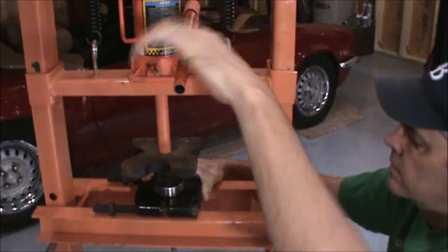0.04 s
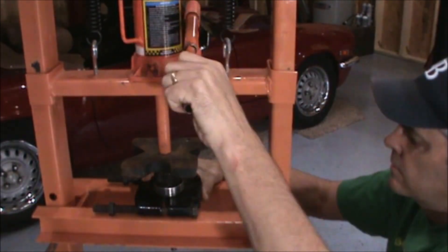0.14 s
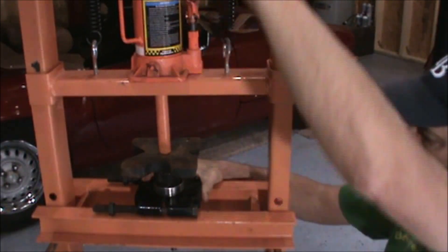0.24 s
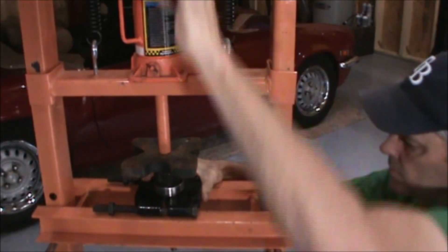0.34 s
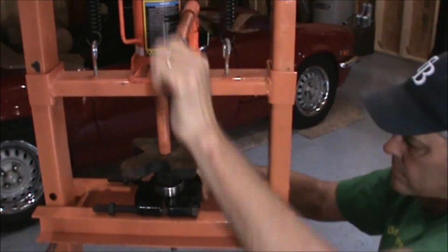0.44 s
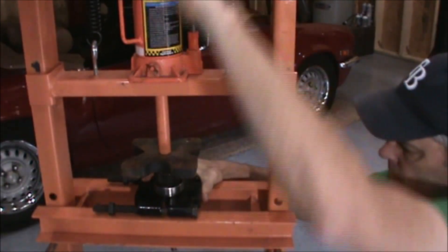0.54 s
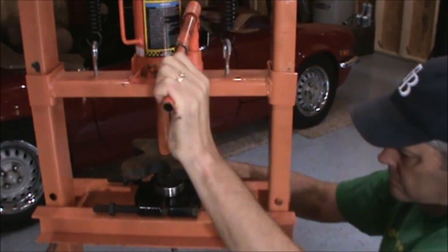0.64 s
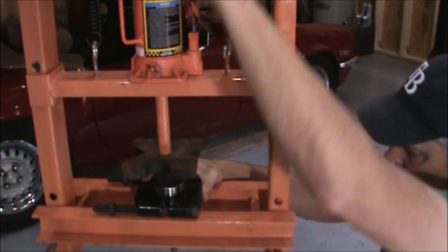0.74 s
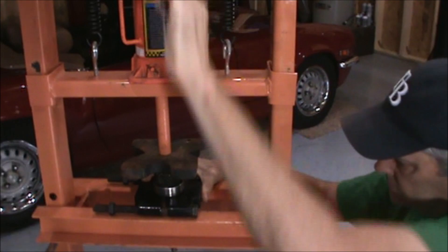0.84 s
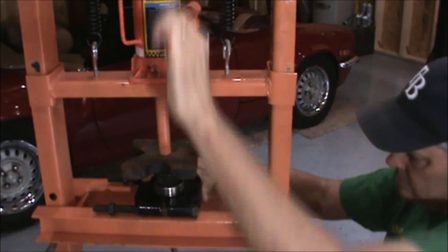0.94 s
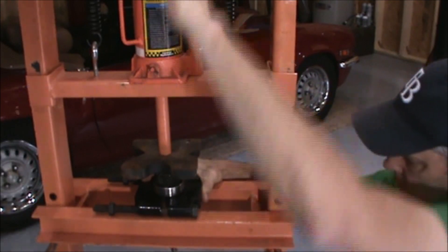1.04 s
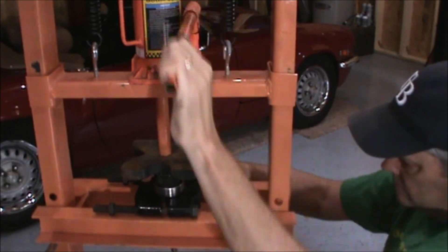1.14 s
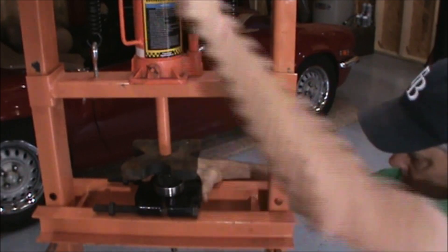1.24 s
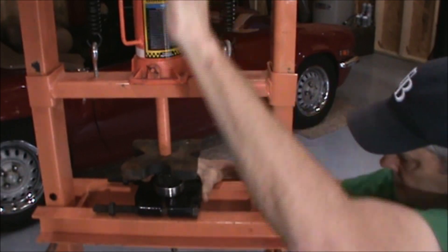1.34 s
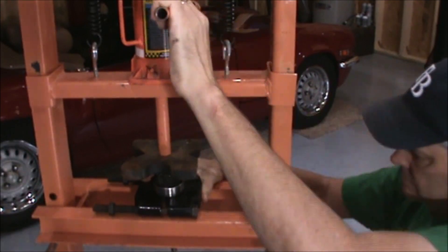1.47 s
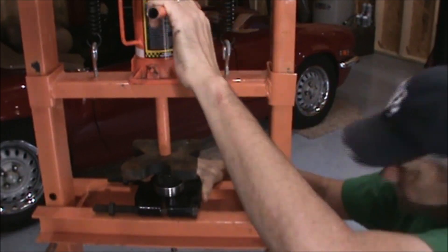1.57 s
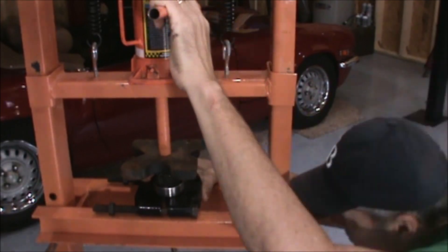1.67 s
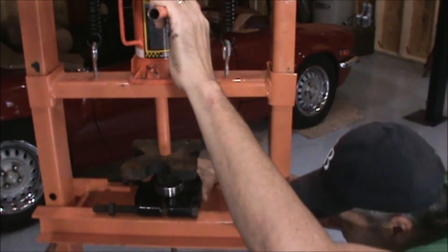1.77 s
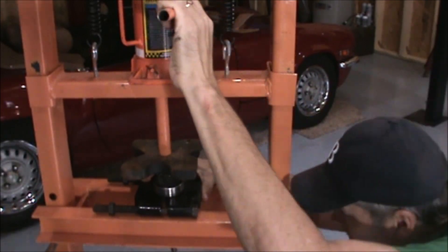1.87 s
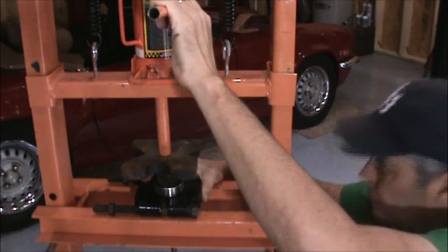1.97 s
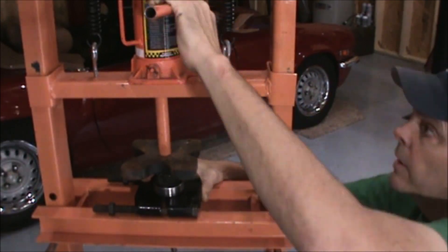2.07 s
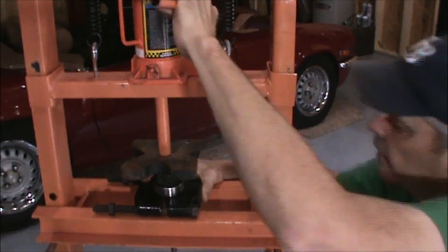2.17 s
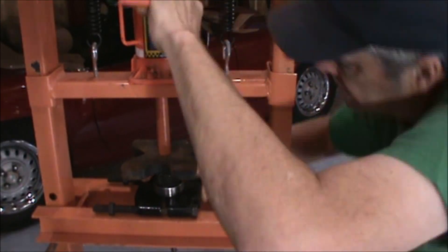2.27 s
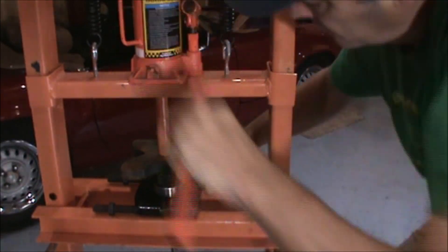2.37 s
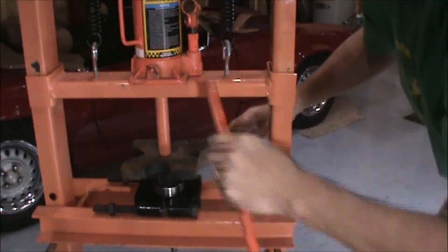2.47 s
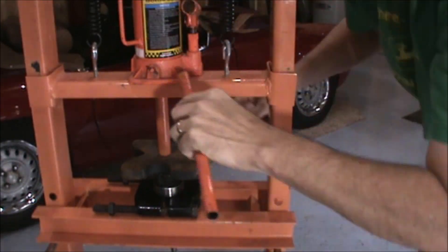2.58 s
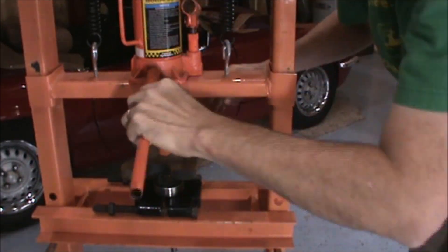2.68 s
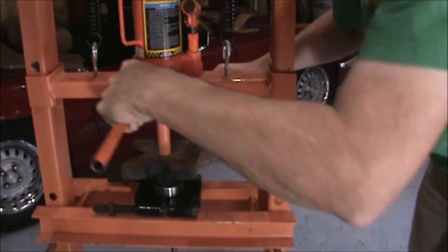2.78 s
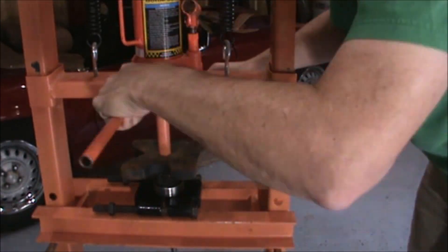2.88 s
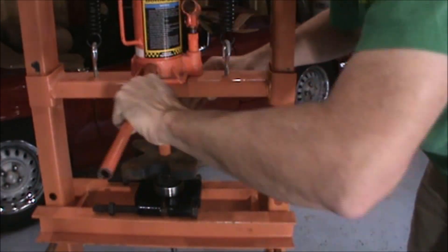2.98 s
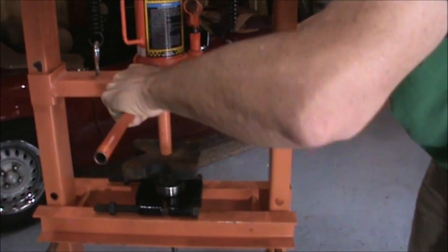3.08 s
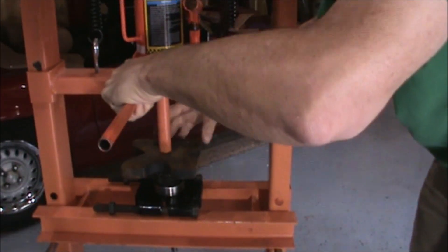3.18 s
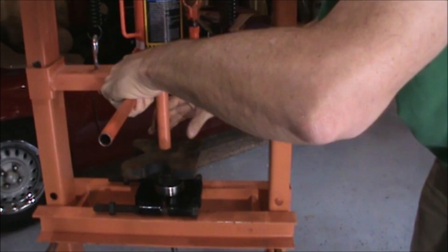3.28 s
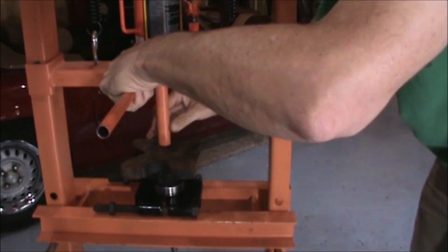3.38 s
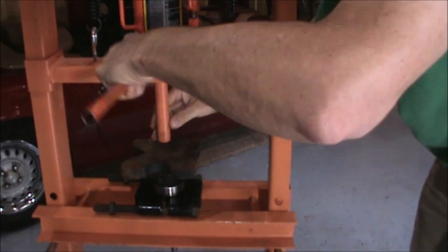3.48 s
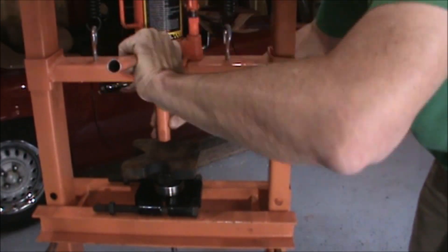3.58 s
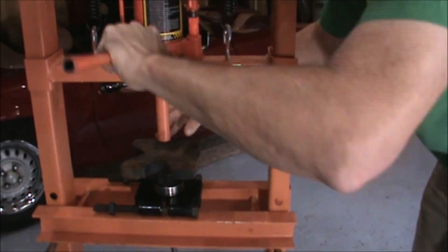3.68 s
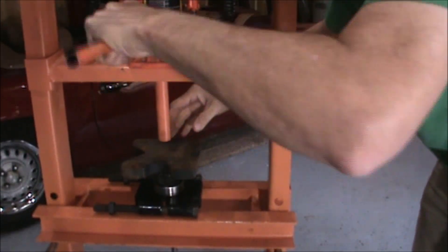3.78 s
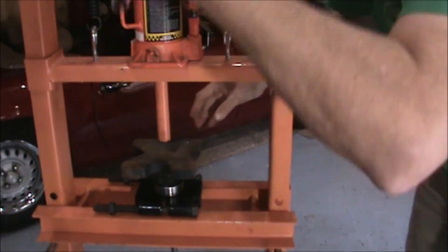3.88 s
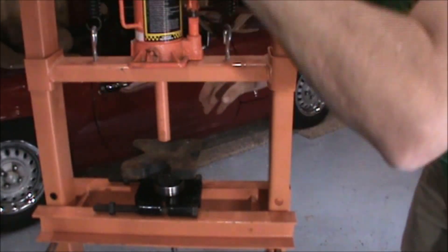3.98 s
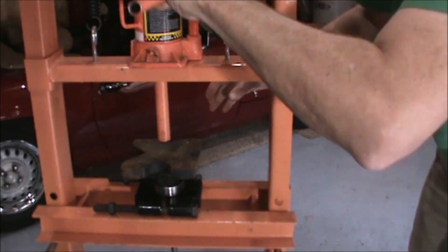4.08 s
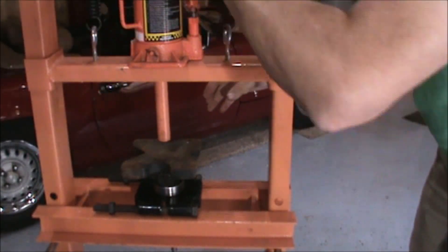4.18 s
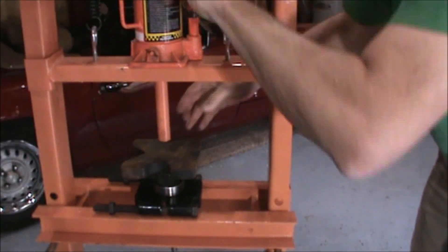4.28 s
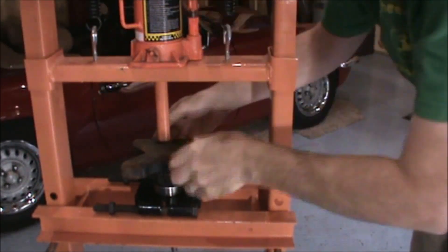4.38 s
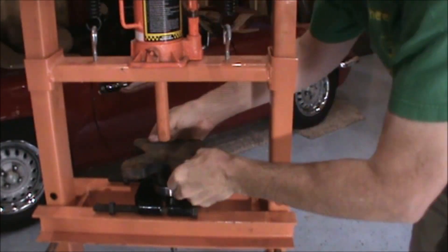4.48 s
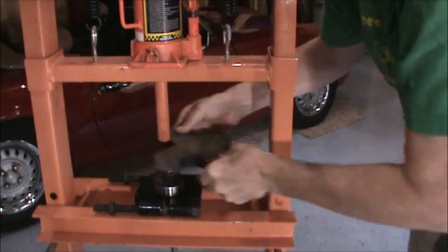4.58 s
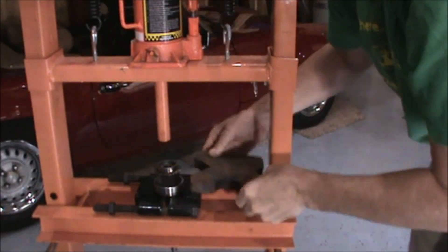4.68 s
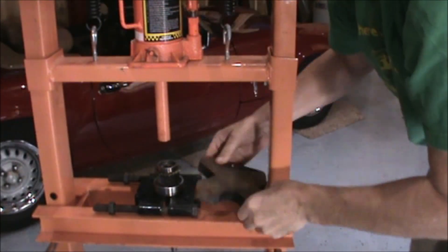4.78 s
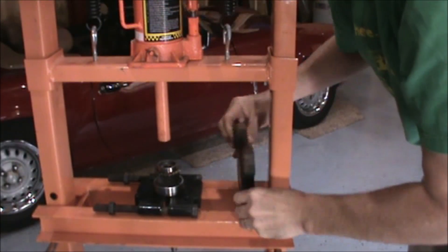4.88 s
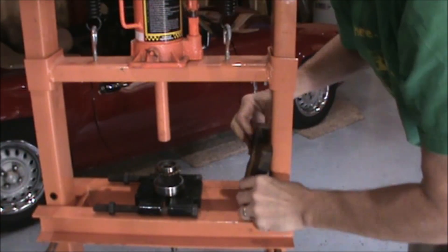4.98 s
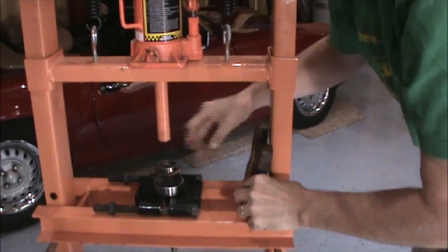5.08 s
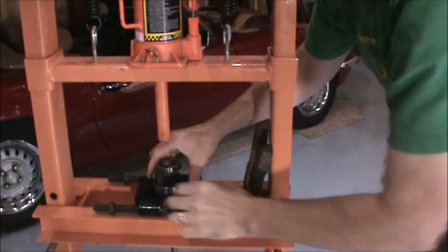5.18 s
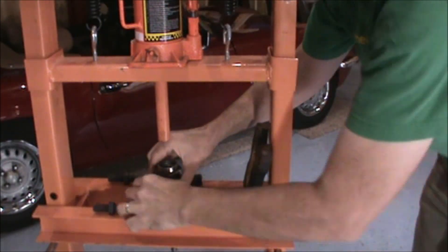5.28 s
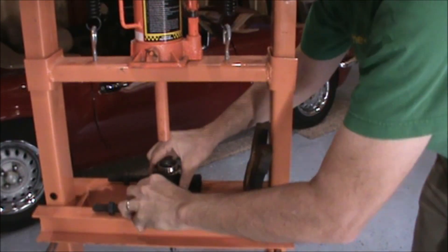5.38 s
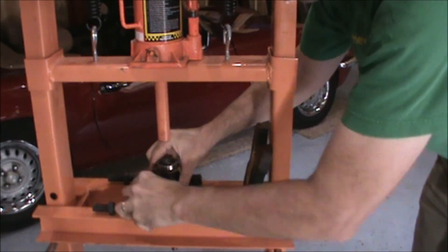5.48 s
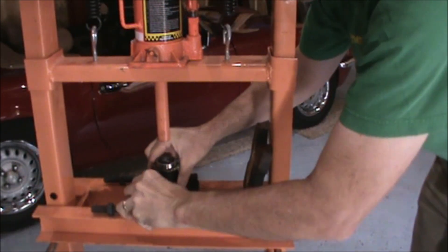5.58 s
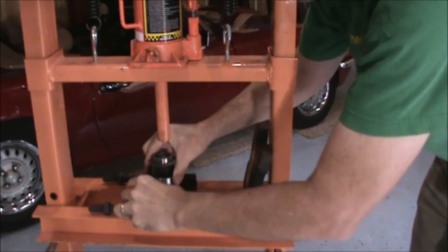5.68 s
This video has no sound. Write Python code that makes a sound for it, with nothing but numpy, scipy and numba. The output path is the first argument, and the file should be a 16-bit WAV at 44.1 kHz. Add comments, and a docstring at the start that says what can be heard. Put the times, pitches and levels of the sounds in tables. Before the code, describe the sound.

A steel tube clanks five times in quick succession against the valve of a jack, leaving a thin, high ring. After a short creak come irregular metallic knocks and rattles, a faint sliding hiss and a brief squeal from the pump. More clinks follow, then one bright clang of a steel plate and a light tink. The sounds are fairly dry and slightly left, over the steady rush and hum of a garage fan.

```python
"""In a garage, a bottle jack on a steel shop press is worked by hand while a fan hums behind.
The hollow handle clanks on the release valve in five quick twists, creaks off it, knocks into the pump
socket, squeals through a stroke and rattles out again; then a steel plate is set down. Struck steel
rings at many pitches at once; rubbed steel sticks and slips, so it creaks, squeals or hisses.
The camera's gain control holds down the loud blows."""
import sys
import numpy as np
from scipy import signal
from scipy.fft import rfft, irfft
from scipy.io import wavfile
from numba import njit

SR = 44100
rng = np.random.default_rng(int(sys.argv[2]) if len(sys.argv) > 2 else 0)


def file_out(sig):
    """Save sig as 16-bit WAV at sys.argv[1]."""
    # one column per channel
    cols = np.atleast_2d(sig).T
    # limit, then scale
    lim = np.clip(cols, -1, 1)
    pcm = np.round(lim * 32767).astype(np.int16)
    wavfile.write(sys.argv[1], SR, pcm)


N = 252674
T = np.arange(N) / SR


def undb(db):
    """Turn decibels into a gain to multiply by."""
    return 10 ** (np.asarray(db) / 20)


def unit(x):
    """Scale a sound to an average (rms) strength of 1."""
    return x / np.sqrt(np.mean(x ** 2))


def tint(x, points):
    """Shape bass and treble along a curve of (pitch_hz, level_db) points."""
    hz, db = np.transpose(points)
    bins_hz = np.maximum(np.fft.rfftfreq(x.shape[-1], 1 / SR), 1)
    return irfft(rfft(x) * undb(np.interp(np.log(bins_hz), np.log(hz), db)), x.shape[-1])


def cut_bass(x, hz):
    """Weaken everything below hz."""
    return signal.sosfilt(signal.butter(2, hz, "high", fs=SR, output="sos"), x)


def resonate(x, body):
    """Let a sound ring a body made of (pitch_hz, width_hz, level_db) resonances."""
    return sum(undb(db) * signal.lfilter(*signal.iirpeak(hz, hz / width, fs=SR), x)
               for hz, width, db in body)


def wander(per_s):
    """A random drift of about 1 either way, turning per_s times a second."""
    points = rng.standard_normal(int(N / SR * per_s) + 2)
    return np.interp(T * per_s, np.arange(len(points)), points)


def swell(times, db):
    """A gain that follows a level curve and is silent outside it."""
    return undb(np.interp(T, times, db)) * (T >= times[0]) * (T <= times[-1])


def gesture(start_s, rise_s, hold_s, fade_s):
    """A gain that rises, holds and dies away. Here and below, fade_s is the time to fall 60 dB."""
    rising = np.clip((T - start_s) / rise_s, 0, 1) ** 2
    return rising * undb(-60 * np.maximum(T - start_s - rise_s - hold_s, 0) / fade_s)


def add(out, start_s, sound):
    """Mix a sound in at start_s."""
    start = int(start_s * SR)
    out[:, start:start + sound.shape[-1]] += sound[..., :N - start]


# the bass and treble of the rushing air: pitch_hz, level_db
AIR_COLOUR = [(24, -73), (40, -51.5), (144, -19), (329, -8.5), (382, -9.5), (479, -5.5), (585, -10.5),
              (942, -8), (2100, -13), (4240, -14), (4570, -13.5), (6020, -17.5), (6650, -19), (11300, -23),
              (16000, -29)]
# the air noise, which swells and sinks over time: time_s, level_db
AIR_LEVELS = [(0, -49.5), (1.9, -52), (2.6, -48), (3.3, -46.5), (3.9, -51), (4.4, -51.5), (4.7, -49),
              (5.3, -53.5), (5.73, -49.5)]
# the tones of the fan: pitch_hz, level_db
FAN_TONES = [(336, -103), (480, -60), (962, -65), (1346, -63.5)]

def fan():
    """A fan makes rushing air and wavering tones; the bass is alike in both ears."""
    mid, side = unit(tint(rng.standard_normal((2, N)), AIR_COLOUR))
    side = undb(-12) * tint(side, [(300, -19), (1200, 1.5), (12000, 11.0)])
    air = np.array([mid + side, mid - side]) * undb(np.interp(T, *np.transpose(AIR_LEVELS)))
    hum = 0
    for hz, db in FAN_TONES:
        gain = undb(db + 2 * wander(4.7))
        pitch_hz = hz * (1 + 0.00343 * wander(15))
        hum += gain * np.sin(2 * np.pi * np.cumsum(pitch_hz) / SR)
    return air + np.sqrt(2) * hum


def room(x, echo_db=-13, fade_s=0.16, treble_fade_s=0.03, side_db=-6):
    """The cluttered garage adds a short wash of echoes whose treble dies first."""
    t = T[:SR // 2]
    mid, side = rng.standard_normal((2, len(t)))
    noise = np.array([mid + undb(side_db) * side, mid - undb(side_db) * side])
    low = tint(noise, [(4500, 8.5), (9000, 0)])
    tail = (low * undb(-60 * t / fade_s) + (noise - low) * undb(-60 * t / treble_fade_s)) * (t > .004)
    tail = tail / np.sqrt(np.sum(tail ** 2) / 2)
    return x + undb(echo_db) * signal.fftconvolve(x.mean(axis=0)[None], tail, axes=1)[:, :N]


def slide(body, grain_db):
    """Sliding steel catches on countless tiny bumps, which ring its body."""
    catches = rng.standard_normal(N) * undb(grain_db * wander(620))
    return unit(resonate(catches, body))


# how loudly the plunger slides: time_s, level_db
PLUNGER_LEVELS = [(3.08, -45), (3.16, -50.5), (3.36, -46.5), (3.56, -42), (3.7, -57)]
# the resonances of the plunger: pitch_hz, width_hz, level_db
PLUNGER_BODY = [(4220, 32, 1.5), (7000, 240, -10.5), (10700, 1700, -10), (12000, 150, -9), (12800, 320, -8),
                (14000, 150, -6), (15700, 500, -11)]

def plunger():
    """The pump plunger slides with a thin hiss."""
    return slide(PLUNGER_BODY, grain_db=3.5) * swell(*np.transpose(PLUNGER_LEVELS))


# the scrapes of the handle: start_s, rise_s, hold_s, fade_s, level_db
SCRAPES = [(2.167, 0.051, 0.048, 0.37, -36), (3.573, 0.0045, .003, 0.11, -31)]
# the resonances that scraping wakes: pitch_hz, width_hz, level_db
SCRAPE_BODY = [(2720, 280, 1), (3130, 870, 7), (6900, 2200, 0.5), (10500, 370, 7)]

def scrapes():
    """The handle slides over dry steel."""
    gain = sum(undb(db) * gesture(*timing) for *timing, db in SCRAPES)
    return slide(SCRAPE_BODY, grain_db=1.5) * gain


# the course of the creak: time_s, slips_per_s, relative_level_db
CREAK_SLIPS = [(2.136, 800, -34.5), (2.146, 700, -24), (2.174, 990, -25), (2.188, 530, -28.5),
               (2.204, 630, -47)]
# the resonances that creaking wakes: pitch_hz, width_hz, level_db
CREAK_BODY = [(800, 1030, 3.5), (2250, 330, 6), (2555, 40, 12), (5940, 1340, 4.5)]

def creak():
    """Twisted off the valve, the handle slips in uneven jerks, and each one rings it."""
    times, slips_per_s, db = np.transpose(CREAK_SLIPS)
    slip_count = np.cumsum(np.interp(T, times, slips_per_s) * (1 + .07 * wander(600))) / SR
    slips = np.diff(np.floor(slip_count), prepend=0) * undb(4.3 * wander(500))
    colour = [(300, -14), (700, -0.5), (2800, 3.5), (4000, -3.0), (6300, -12.0), (12000, -5.5)]
    return unit(tint(resonate(slips, CREAK_BODY), colour)) * swell(times, db - 3.5)


# steel squealing on steel: start_s, hold_s, pitch_hz, glide_hz_per_s, level_db, roughness (0 to 1)
SQUEALS = [(3.087, .004, 13550, 50000, -23, 0.1), (3.487, 0.015, 2395, 400, -22.5, 0.02),
           (3.503, 0.049, 3610, 1232, -23, 0), (3.564, .004, 3800, -5000, -27, 0.06)]
# a squeal's tones at 1, 2, 3 and 4 times its pitch: level_db
SQUEAL_HARMONICS = [2, -3.5, -7.5, -10.5]

def squeals(rise_s=0.0064, fade_cycles=230, hand_waver=0.0044):
    """The pump linkage sticks and slips in step with one of its own tones, so it sings."""
    out = np.zeros(N)
    for start_s, hold_s, hz, glide, db, roughness in SQUEALS:
        pitch_hz = hz + glide * np.clip(T - start_s, 0, 2 * (rise_s + hold_s))
        pitch_hz *= 1 + roughness * wander(1500) + hand_waver * wander(90)
        phase = 2 * np.pi * np.cumsum(pitch_hz) / SR
        phase += .12 * wander(3000)  # each slip comes a little early or late
        tone = sum(undb(level) * np.sin(k * phase)
                   for k, level in enumerate(SQUEAL_HARMONICS, 1) if k * hz < SR / 2)
        gain = undb(db + 2 * wander(700)) * gesture(start_s, rise_s, hold_s, fade_cycles / hz)
        out += gain * unit(tone)
    return out


def ring(tones, split=0.00281, neighbour_db=-9, spread=.05):
    """Steel sings on; an uneven wall splits each tone into a throbbing pair with weaker neighbours."""
    t, out = T[:2 * SR], 0
    for hz, db, fade_s in tones:
        offset, above, below, first, second = rng.uniform(-1, 1, 5)
        phase = 2 * np.pi * hz * t
        pair = np.sin(phase + np.pi * first) + 0.6 * np.sin(phase * (1 + split * offset) + np.pi * second)
        neighbours = np.sin(phase * (1 + spread * abs(above))) - np.sin(phase * (1 - spread * abs(below)))
        neighbours *= undb(neighbour_db) * (hz / 5000) ** 2  # stronger in the treble, where tones crowd
        out += undb(db) * (pair + neighbours) * undb(-60 * t / fade_s)
    return out


# the moments when the hollow handle rings on, after a clank or the squeal: start_s, level_db
HANDLE_RINGS = [(.44, -48), (1.4113, -30), (3.57, -52)]
# the lingering tones of the handle: pitch_hz, level_db, fade_s
HANDLE_LONG_TONES = [(2360, 8.5, 0.22), (2598, -11.5, 1.95), (2660, -4.5, 0.56), (2740, 7, 0.15),
                     (3370, 5, 0.17), (3650, -26, 1.3), (5440, 8, 0.35), (4400, -21, 2.3), (4200, -24, 1.0),
                     (4720, -6.5, 0.98), (5050, -14, 1.6), (4780, 7.5, 0.34), (5200, 3, 0.34),
                     (5250, -7, 0.57), (5370, 6.5, 0.55), (5200, -9, 0.84), (5502, -11.5, 2.1),
                     (5670, -9, 1.35), (5766, -10.5, 1.2), (6140, -3, 0.83), (5920, -3, 1.23),
                     (5880, 11.5, 0.43), (6000, -8.5, 1.96), (6600, -14, 0.75), (6440, -6, 0.54),
                     (6680, 9, 0.23)]

def handle_shimmer():
    """The hollow handle rings on after a clank or the squeal; it is too thin to give off bass."""
    out = np.zeros((2, N))
    for start_s, db in HANDLE_RINGS:
        add(out, start_s, undb(db) * ring(HANDLE_LONG_TONES))
    return cut_bass(out, 1200)


def strike(hits, tones, colour, long_tones, ring_db, side_db, low_hz, noise_db=-1.5, detune=.004):
    """Struck steel gives a few strong tones, countless weak ones (played as noise) and a long ring."""
    out, t = np.zeros((2, N)), T[:SR // 3]
    tone_hz, tone_db = np.transpose(tones)
    for start_s, db, treble_db, fade_s, rise_s in hits:
        # each blow meets another spot and grip, which changes the strength and pitch of every tone
        flip, louder, sharper = rng.standard_normal((len(tones), 3)).T
        weights = np.sign(flip) * undb(tone_db + 2.5 * louder + treble_db * np.log2(tone_hz / 5000) / 3)
        waves = np.sin(2 * np.pi * np.outer(tone_hz * (1 + detune * sharper), t))
        clang = weights / np.linalg.norm(weights) @ waves
        # loose faces chatter while they touch, so the start is gritty
        chatter = undb(3 * np.repeat(rng.standard_normal(len(t)), 24)[:len(t)] * np.exp(-t / .03))
        noise = unit(tint(rng.standard_normal((2, len(t))) * chatter, colour))
        # a harder contact is brighter
        noise = tint(noise, [(1500, -treble_db / 4), (5000, 0), (14000, treble_db)])
        mid = undb(noise_db) * noise[0] + clang
        side = undb(side_db) * tint(noise[1], [(7000, -0.5), (13000, 1.5)])
        envelope = np.minimum(1, t / rise_s) ** 2 * undb(-60 * np.maximum(t - rise_s, 0) / fade_s)
        add(out, start_s, undb(db) * unit(np.array([mid + side, mid - side])) * envelope)
        if db > -19:  # only firm blows wake the long ring
            add(out, start_s, undb(db + ring_db) * ring(long_tones))
    return cut_bass(out, low_hz)  # narrow steel parts give off hardly any bass


# small parts touching: start_s, level_db, treble_db, fade_s, rise_s
TINKS = [(3.155, -20, -4.5, 0.043, 0.0035), (4.553, -29.5, -15, 0.034, 0.00044),
         (5.402, -32, -11, 0.21, 0.0022), (5.405, -17.5, -0.5, 0.023, 0.0063)]
# their short tones: pitch_hz, level_db
TINK_TONES = [(4585, -14), (4830, -15), (6765, -21), (8625, 0)]
# their lingering tone: pitch_hz, level_db, fade_s
TINK_RING = [(8625, 0, 0.13)]

def tinks():
    """Small steel parts tink together; their weak tones are coloured like the handle's."""
    return strike(TINKS, TINK_TONES, HANDLE_COLOUR, TINK_RING,
                  ring_db=-46, side_db=-22, low_hz=700, noise_db=-6.5)


# the bumps of the plate: start_s, level_db, treble_db, fade_s, rise_s
PLATE_HITS = [(4.785, -27.5, -5.5, 0.11, 0.0021), (4.9801, -40.5, -16, 0.22, 0.00098),
              (5.0339, -10, 9.5, .12, 0.0005), (5.5213, -44, 7, 0.084, 0.0032)]
# its strong, short tones: pitch_hz, level_db
PLATE_TONES = [(2090, 6), (2750, 7), (3230, 14), (3357, -1), (3484, 9), (4430, 1), (4633, 5.5), (4826, 8.5),
               (5130, 7), (5534, 7), (8430, -3), (10250, -3)]
# its countless weak tones, as a curve: pitch_hz, level_db
PLATE_COLOUR = [(50, -33), (300, -26), (700, -9), (1200, 0), (2300, 1.5), (3300, 7), (5300, 0), (7200, -3),
                (8400, -2.5), (11000, -11.5), (16000, -17.5)]
# its lingering tones: pitch_hz, level_db, fade_s
PLATE_RING = [(4823, 0, .38), (5055, -14, .3), (5862, -9, .45)]

def plate():
    """A steel plate is lifted and set down with a clang."""
    return strike(PLATE_HITS, PLATE_TONES, PLATE_COLOUR, PLATE_RING,
                  ring_db=-18.5, side_db=-15.5, low_hz=400, noise_db=-2.5)


# the handle's strong, short tones: pitch_hz, level_db
HANDLE_TONES = [(1350, -14.5), (2330, -4), (2600, -2.5), (3240, -5.5), (4050, 4.5), (4480, -4), (4945, 0),
                (5510, 3.5), (6160, 2.5), (7030, 1), (7215, 2.5), (7830, -16)]
# its countless weak tones, as a curve: pitch_hz, level_db
HANDLE_COLOUR = [(60, -38), (400, -39.5), (1000, -5), (1900, -6.5), (2600, -4), (4500, 0), (7000, -0.5),
                 (9000, -2), (12000, -1), (16000, -1)]
# the lingering tones of the press frame: pitch_hz, level_db, fade_s
FRAME_RING = [(2595, -17, 1.4), (3876, -4, 1.0), (4020, -6, .5), (4107, -5, .7), (4320, -10, .8),
              (4538, -7, .9), (4737, -7, .6), (4899, -5, .7), (5405, -14, .8), (5857, -13, .6)]

def strike_handle(hits, ring_db=-35.5, side_db=-21, noise_db=-1.5):
    """The hand-held tube clinks at slightly new pitches each time; firm blows ring the frame too."""
    return strike(hits, HANDLE_TONES, HANDLE_COLOUR, FRAME_RING, ring_db, side_db,
                  low_hz=600, noise_db=noise_db, detune=.012)


# spells of rattling: start_s, length_s, level_db
RATTLES = [(2.481, .05, -37.5), (2.899, 0.073, -36), (4.148, 0.2, -39)]

def rattles(touches_per_s=50, scatter_db=2, treble_db=7.5, fade_s=0.1, rise_s=0.00019):
    """Guided in or out, the loose handle taps faintly, uneven in time and strength."""
    hits = []
    for start_s, length_s, db in RATTLES:
        for beat_s in np.arange(start_s, start_s + length_s, 1 / touches_per_s):
            late, soft = rng.uniform(-1, 1, 2)
            touch_s = beat_s + .5 * late / touches_per_s
            hits.append((touch_s, db - scatter_db * soft, treble_db, fade_s, rise_s))
    return strike_handle(hits)


# the handle's knocks: start_s, level_db, treble_db, bounce_gap_s, bounce_change_db
KNOCKS = [(0.187, -22, 6, .004, -10), (0.249, -24.5, 11, .0105, 3.5), (0.321, -29, 9, .004, -5.5),
          (0.567, -30, 12, .004, -7), (2.2663, -23.5, 21, .029, 1.5), (2.3541, -31, 5, .004, -3),
          (2.5325, -20.5, 6, .004, -4.5), (2.6482, -34, 21, .004, -20), (2.7433, -18, 6, 0.0054, -5),
          (2.8715, -22.5, -0.5, .0116, -0.5), (2.9678, -23, 10, .004, -7.5),
          (3.032, -18.5, 10.5, 0.016, -6), (3.087, -38, -44, 0.0067, -2.5), (3.6071, -23, 2, .004, -7.5),
          (3.801, -25.5, 3.5, .0203, -8), (4.132, -30, 5.5, .0185, -3), (4.196, -22.5, 12, .019, -18),
          (4.226, -20.5, 14, .014, -4.5), (4.3124, -32.5, -12, .016, -4)]

def knocks(contact_fade_s=.045, bounce_fade_s=0.12, rise_s=0.00019):
    """The handle knocks on valve and socket: the first contact is damped, the bounce rings out."""
    hits = []
    for start_s, db, treble_db, gap_s, change_db in KNOCKS:
        hits.append((start_s, db, treble_db, contact_fade_s, rise_s))
        hits.append((start_s + gap_s, db + change_db, treble_db, bounce_fade_s, rise_s))
    return strike_handle(hits)


# the five twists: slam_s, level_db, treble_db, slack_lead_s, rebound_gap_s, last_change_db, fade_s
TWISTS = [(0.3994, -20, -2, 0.05, 0.02, 6.5, 0.25), (0.633, -17.5, 0, 0.032, 0.034, 5.5, 0.29),
          (0.9, -16, -1, 0.054, 0.029, -10, .24), (1.1554, -15.5, 1.5, .0518, .032, -15, 0.28),
          (1.4108, -17.5, 7, 0.051, .017, -2, 0.18)]
# the valve's strong, short tones: pitch_hz, level_db
VALVE_TONES = [(960, -8.5), (1251, 0.5), (1388, 1), (1510, -2.5), (2310, -3.5), (2430, -1), (2640, -19),
               (3350, -18), (3876, 1), (4030, 3.5), (4465, -4), (4940, 4), (5160, -2), (5400, -1.5),
               (5870, 0), (6605, 1.5), (7855, 5), (8264, -17), (8960, 6), (9070, 7), (9772, 3.5),
               (10520, -3), (12300, -6), (13350, 1), (13800, -5)]
# its countless weak tones, as a curve: pitch_hz, level_db
VALVE_COLOUR = [(40, -29), (150, -40), (350, -41), (650, -18), (1000, -4.5), (1400, 2), (1850, -10.5),
                (2400, -1), (3100, -2.5), (4500, 2), (7000, -3.5), (9000, -2.5), (11500, -4.5),
                (16000, -15.5)]

def valve_twists(bite_lag_s=.005, return_lag_s=.112, tick_rise_s=0.00019):
    """The handle's slot ticks as the slack is taken up, bites the pin, slams home and rebounds twice."""
    ticks, bites, slams = [], [], []  # rows: start_s, level_db, treble_db, fade_s, rise_s
    for slam_s, db, treble_db, lead_s, gap_s, last_change_db, fade_s in TWISTS:
        ticks.append((slam_s - lead_s, -25.5, 9, 0.2, tick_rise_s))
        bites.append((slam_s - lead_s + bite_lag_s, -19.5, 4, 0.082, 0.0047))
        slams.append((slam_s, db, treble_db, fade_s, .0005))
        # each rebound starts more gently and dies sooner
        slams.append((slam_s + gap_s, db + 5, treble_db, 0.81 * fade_s, 0.0023))
        slams.append((slam_s + 1.7 * gap_s, db + last_change_db, treble_db, 0.69 * fade_s, 0.0063))
    for slam_s, *_ in TWISTS[:-1]:  # the wrist turns back and the slot ticks off the pin
        ticks.append((slam_s + return_lag_s, -26, 10, 0.14, tick_rise_s))
    clanks = strike(slams, VALVE_TONES, VALVE_COLOUR, FRAME_RING,
                    ring_db=-23.5, side_db=-12.5, low_hz=540)
    return clanks + strike_handle(ticks) + strike_handle(bites, ring_db=-30, side_db=-18.5, noise_db=-5)


def scene():
    """All the steel sounds in the garage, slightly to the left, over the fan."""
    struck = valve_twists() + knocks() + rattles() + handle_shimmer() + plate() + tinks()
    rubbed = squeals() + creak() + scrapes() + plunger()
    lean_left = undb([[.35], [-.35]])
    return room(struck + rubbed) * lean_left + fan()


@njit
def follow_peaks(x, attack_s, release_s):
    """Track the level, rising over attack_s and sinking over release_s."""
    attack, release = 1 - np.exp(-1 / (attack_s * SR)), 1 - np.exp(-1 / (release_s * SR))
    out, level = np.empty(len(x)), 0.
    for i in range(len(x)):
        level += (x[i] - level) * (attack if x[i] > level else release)
        out[i] = level
    return out


def record(dry, ceiling_db=-10, attack_s=.00015, release_s=0.18, overload_db=-1.5, top_hz=15800):
    """The camera's gain control turns loud blows down and recovers slowly; bass and top are cut."""
    peak = follow_peaks(np.abs(dry).max(axis=0), attack_s, release_s)
    held = dry * np.minimum(1, undb(ceiling_db) / (peak + 1e-9))
    # peaks that slip through are rounded off, a little lopsidedly
    rounded = undb(overload_db) * np.tanh(held / undb(overload_db)) - 0.05 * held ** 2
    return signal.sosfilt(signal.ellip(10, .2, 70, top_hz, fs=SR, output="sos"), cut_bass(rounded, 35))


dry = scene()
out = record(dry)
file_out(out)
```